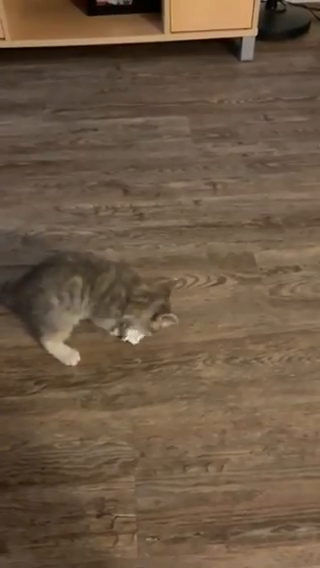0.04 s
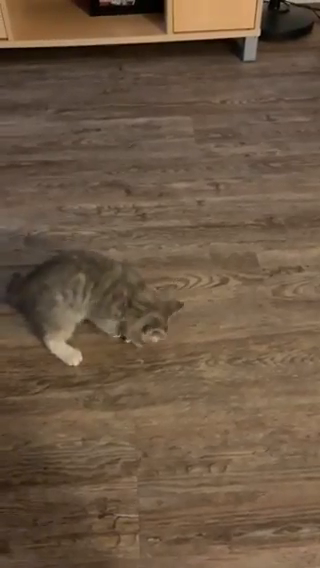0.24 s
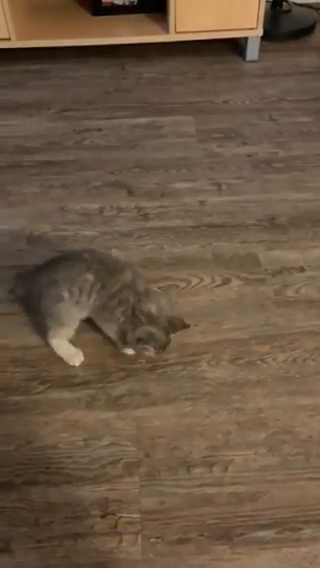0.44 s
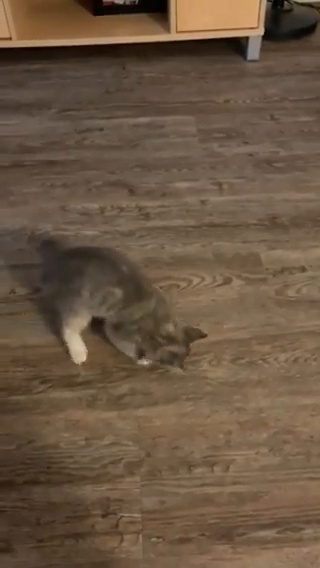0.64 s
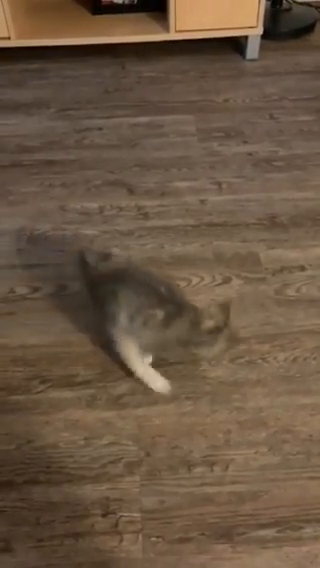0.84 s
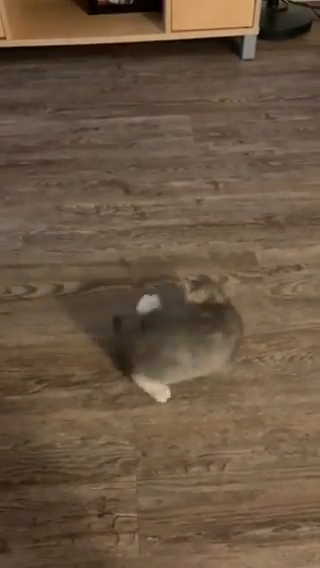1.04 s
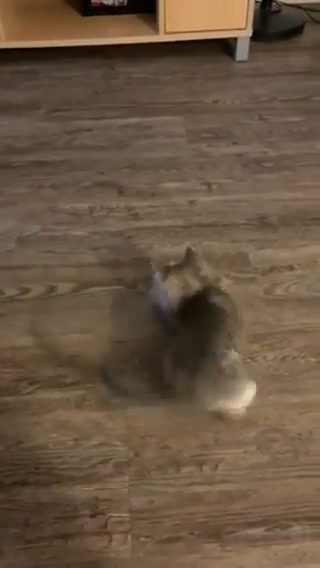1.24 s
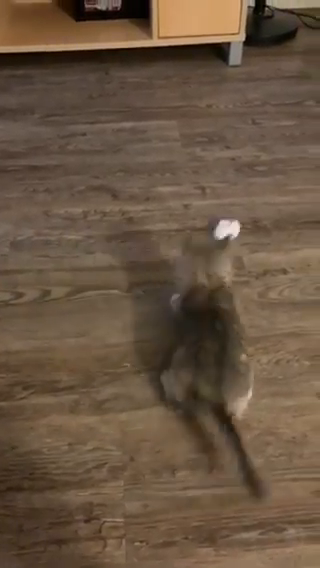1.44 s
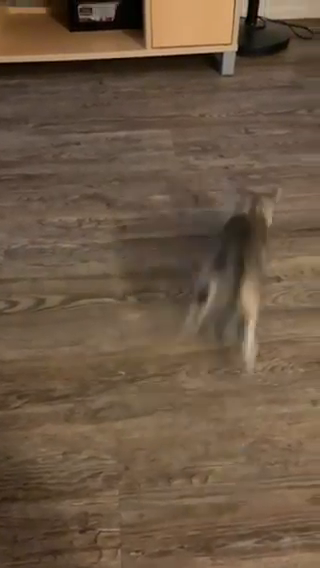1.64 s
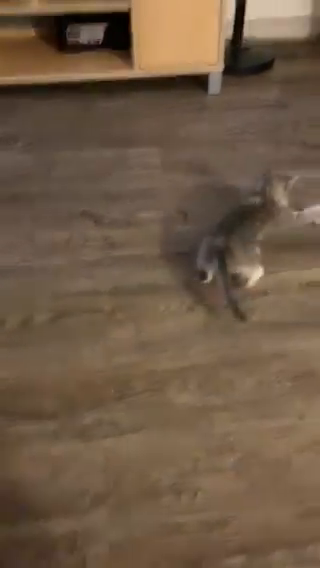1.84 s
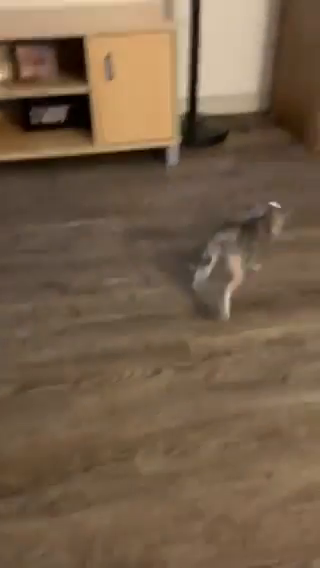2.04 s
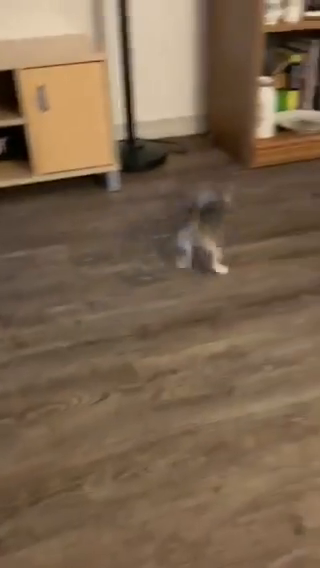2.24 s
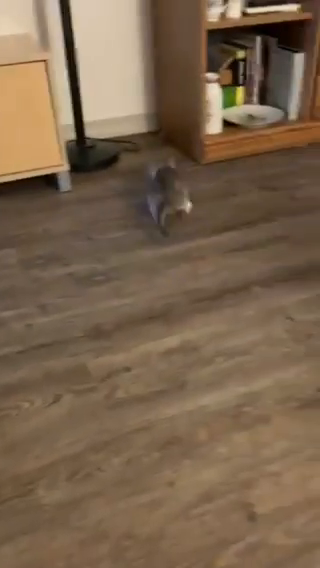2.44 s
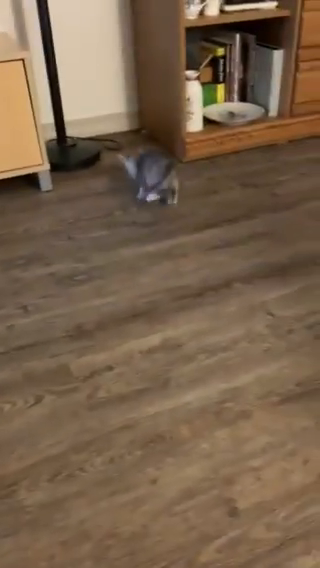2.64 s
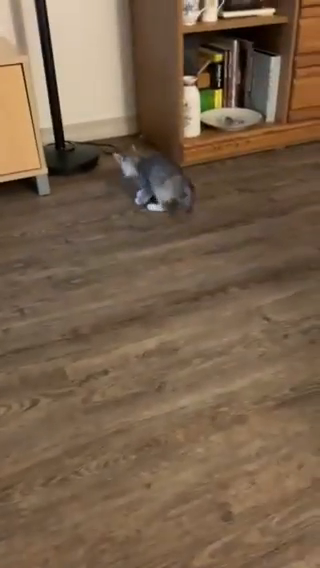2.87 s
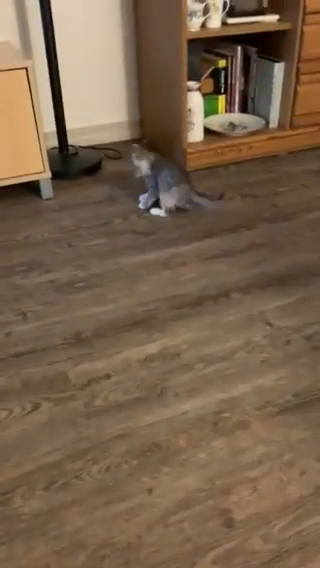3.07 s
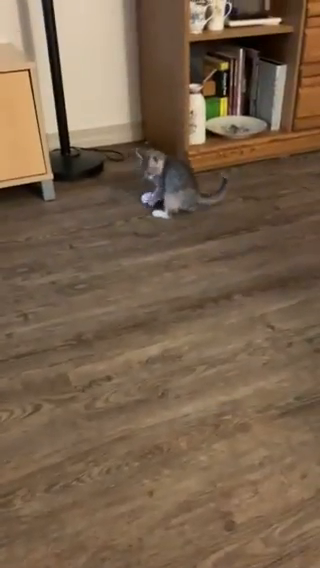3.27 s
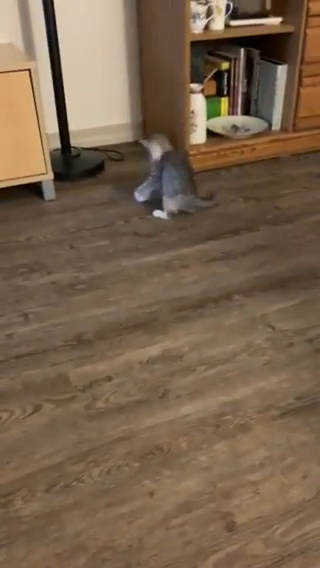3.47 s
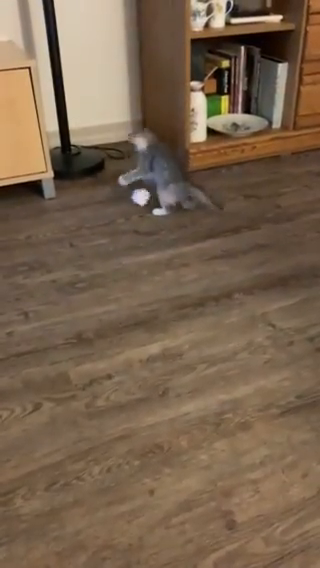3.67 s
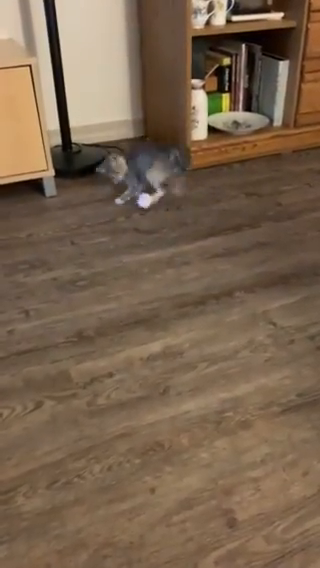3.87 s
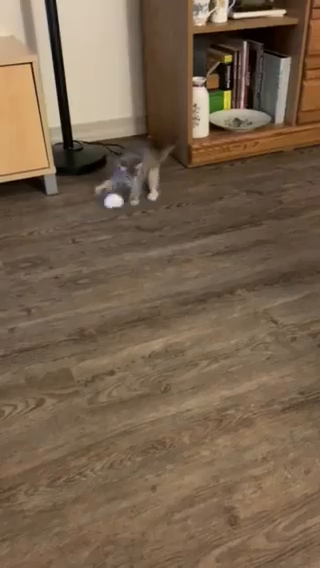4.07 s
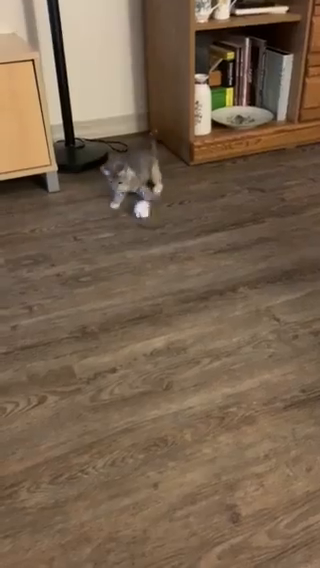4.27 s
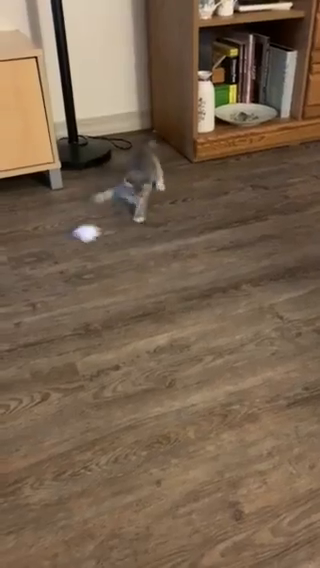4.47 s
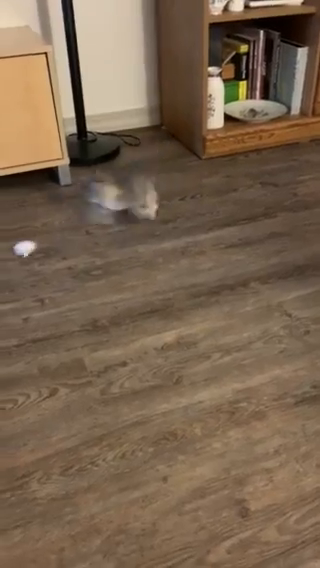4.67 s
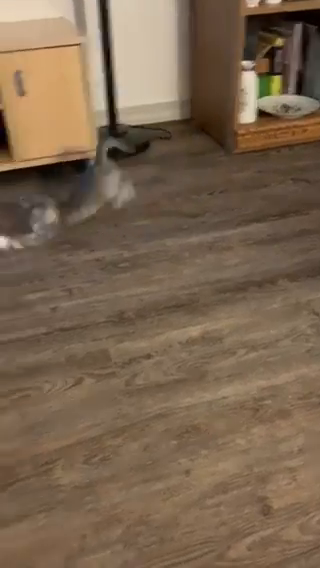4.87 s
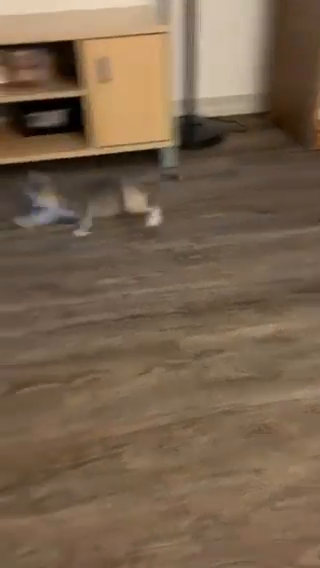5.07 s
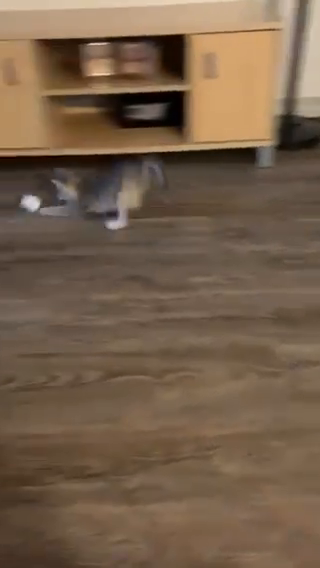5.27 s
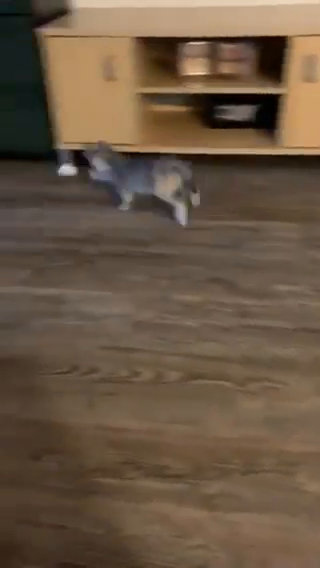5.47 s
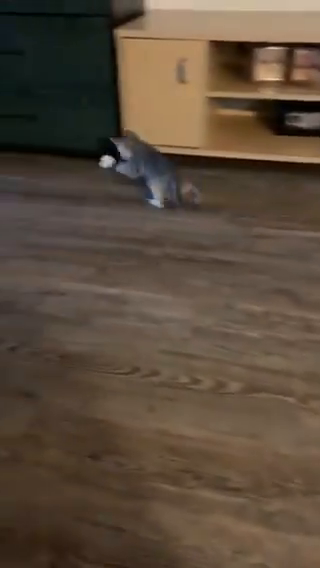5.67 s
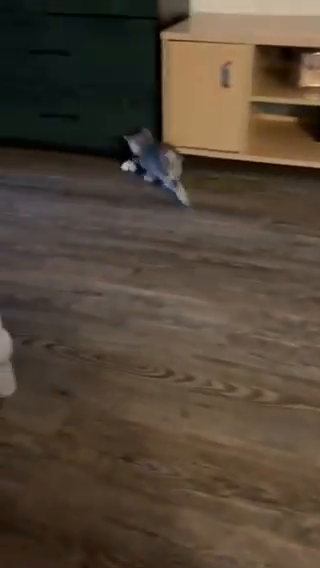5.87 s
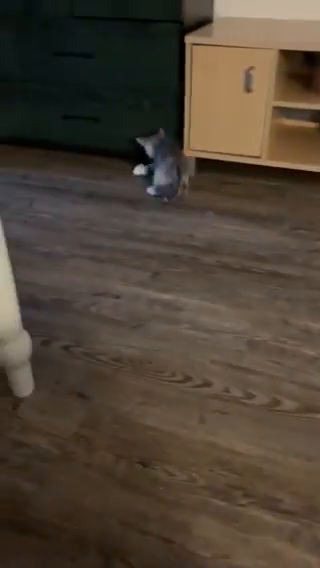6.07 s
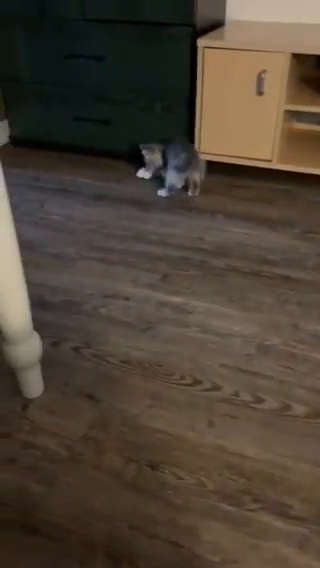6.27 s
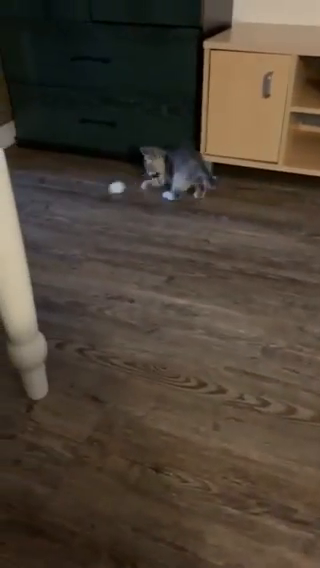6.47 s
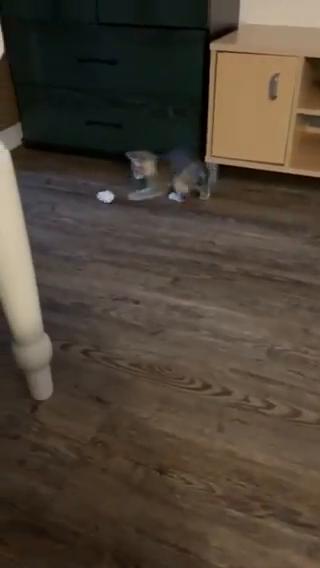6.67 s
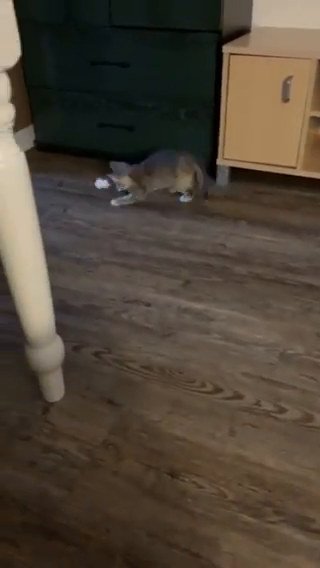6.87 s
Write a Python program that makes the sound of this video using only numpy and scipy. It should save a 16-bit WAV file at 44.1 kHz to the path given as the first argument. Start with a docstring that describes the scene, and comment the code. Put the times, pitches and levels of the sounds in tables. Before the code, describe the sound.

A kitten bats and chases a light hollow toy over a living-room plank floor. Faint scrapes grow into a flurry of sharp taps, skids and soft paw thumps. After a short lull the clicking returns, gets busier and louder, eases, then ends in another flurry. The toy whirs briefly as it rolls. A close stereo microphone picks up a short room ring, faint air rumble and an appliance hum.

```python
"""A light hollow toy, batted and chased by a kitten over a living-room plank floor.
Toy and claws tap and skid: stick-slip impulses ring the planks and the toy's shell.
The rolling toy whirs in one gliding resonance; soft paws thump the boards.
The room rings briefly, air rumbles, an appliance hums. Heard by a close microphone pair."""
import sys
import numpy as np
from scipy import signal
from scipy.fft import rfft, irfft, next_fast_len
from scipy.io import wavfile
from scipy.ndimage import map_coordinates

SR = 44100
rng = np.random.default_rng(int(sys.argv[2]) if len(sys.argv) > 2 else 0)


def persist_wave(psi):
    """Save psi, clipped to +-1, as 16-bit WAV."""
    counts = np.round(np.clip(psi, -1, 1) * 32767).astype(np.int16)
    wavfile.write(sys.argv[1], SR, np.atleast_2d(counts).T)


N = 305172

# toy and claw taps: (time [s], level [dB], chatter [s], brightness [dB], top octave [dB],
# ring [Hz], ring gain [dB])
TOY_TAPS = [(0.471, -58, 0.0093, -4.5, -3, 1090, 11), (1.001, -46.5, 0.0084, 2.5, -5, 840, -9),
            (1.058, -48.5, 0.013, 1, -4, 1770, 4), (1.1, -46.5, 0.0063, -0.5, -1, 835, 12),
            (1.218, -40.5, .008, -6.5, -5, 1560, 16), (1.236, -42, 0.0046, 14, -5, 4030, 22),
            (1.276, -30, .007, 10, -22, 1600, 10), (1.288, -55, 0.011, 24, -1, 1600, 9.5),
            (1.436, -50.5, .009, 1, -6, 1800, 21), (1.471, -42.5, .011, -1, 5.5, 1250, 12),
            (1.518, -43, 0.012, -3, 2, 1250, 6), (1.604, -38.5, .011, 3, -15, 1480, 7.5),
            (1.676, -44, .008, 15, 5, 5900, 0), (1.752, -42, 0.011, 1.5, 4, 970, 8),
            (1.815, -38.5, 0.012, 0.5, 1, 1690, 4), (1.854, -27, .006, 8.5, -3, 3600, 15),
            (1.873, -35, 0.015, 5, 2, 3500, 22.5), (1.887, -24, 0.007, 4.5, -0.5, 2450, 15),
            (1.983, -42, .009, 0, 1, 1400, 9.5), (2.077, -29, 0.0052, -7, 4, 1200, 9),
            (2.102, -33, 0.013, 2, 0, 3340, 13.5), (2.267, -25.5, 0.015, -3.5, -4, 2530, 1),
            (2.272, -33, 0.0064, 5, 5, 1500, 12), (2.404, -39, 0.0047, 9, -1.5, 3310, 10),
            (3.244, -47, .004, -2, -2.5, 1700, 2.5), (3.274, -37.5, .004, 1, -9, 2820, 12),
            (3.515, -35.5, 0.014, 3, 0, 2920, 12), (3.727, -33, .009, -0.5, -1, 940, 11),
            (3.732, -33, 0.0061, -2.5, -1.5, 2900, 4), (3.812, -38, 0.0051, 4.5, -3, 1560, 12),
            (3.958, -40, 0.0074, 0.5, -1, 3110, 14), (4.096, -35.5, 0.021, -8, -5, 1740, 5),
            (4.126, -39.5, 0.0068, 8, -9, 1400, 8), (4.145, -36.5, 0.0082, -5, 7, 1710, 10),
            (4.337, -39.5, .009, 2, -3, 2960, -5), (4.381, -31, 0.0063, -2.5, 8.5, 2950, 15),
            (4.391, -31, 0.013, -10.5, 0, 2950, 5), (4.403, -48, 0.0025, -1, 2, 2400, 3),
            (4.419, -36, 0.0072, 8, 4, 2140, 17.5), (4.46, -39.5, .009, 9.5, 1, 2900, -10),
            (4.506, -38.5, 0.011, -1, 1, 1290, 11), (4.537, -33.5, 0.0088, -2, 7, 940, 9),
            (4.542, -37, 0.0055, 10, 0, 2000, 0), (4.583, -45.5, .004, -1.5, -1, 2000, 2),
            (4.616, -32, 0.012, -1, 3, 3170, 12), (4.623, -32.5, 0.0055, -3, 2, 1800, 8),
            (4.707, -42.5, 0.0063, 0, 3, 1700, 5), (4.722, -23, .005, -9.5, 1, 1900, 13.5),
            (4.727, -34, 0.0059, -4.5, -5, 1350, 15), (4.84, -39.5, 0.013, 0, 4, 2000, 16),
            (4.852, -39.5, 0.012, 9, 15, 2800, 2), (4.869, -32, 0.016, 5, -1.5, 2900, 5),
            (4.884, -31.5, 0.0065, 8, 4, 2100, 9), (5.03, -30.5, 0.0041, 4.5, 0, 3700, 7.5),
            (5.144, -29.5, 0.011, 4, -3.5, 3360, 5), (5.17, -23.5, .003, -1, 2, 1100, 7),
            (5.216, -36.5, .008, 5.5, -1, 2000, 4.5), (5.238, -38, 0.012, 5, 7, 1960, 17),
            (5.254, -24, 0.0055, 14, 1, 2200, 9), (5.258, -28.5, 0.014, -5.5, 0, 2060, 14),
            (5.269, -19.5, 0.0022, 5.5, -4.5, 2750, 10.5), (5.276, -35, 0.011, 6.5, -1, 2200, 7),
            (5.315, -32.5, 0.0061, -4.5, -2, 1250, -3.5), (5.328, -25.5, 0.0044, 7, 7, 1240, 9),
            (5.333, -25, 0.0046, 6, 7.5, 2720, 13), (5.383, -30.5, .009, -4.5, -1.5, 1350, 12.5),
            (5.399, -36.5, 0.022, 6.5, 11.5, 1180, -10), (5.621, -33.5, 0.0059, 3, -8.5, 945, -3),
            (5.738, -38, 0.016, -3, 2.5, 2840, 3), (6.394, -33, .006, 2, 3, 3170, 19.5),
            (6.407, -40.5, 0.0035, 8, 1, 2750, 30), (6.442, -38.5, 0.0085, 9, -4, 2750, 17),
            (6.458, -36, 0.013, 3, 2, 1010, 20), (6.479, -48, 0.0069, 15, 11, 1040, 12),
            (6.497, -37, 0.015, 8.5, -1, 900, 14.5), (6.519, -41.5, 0.0084, 11, 6.5, 1290, 20),
            (6.582, -41.5, .006, 3, 20, 1286, 12), (6.621, -44.5, .007, 9.5, 9.5, 1800, 2),
            (6.773, -34, 0.011, 9.5, -0.5, 1210, 6), (6.799, -28.5, 0.0051, 3.5, -11, 2800, 7),
            (6.816, -30.5, .005, 1.5, -6, 1640, 5), (6.839, -41, .007, 14, 7.5, 850, 18.5),
            (6.892, -35.5, 0.0056, 6.5, 2, 1530, 11)]
# pushes that skid toy and claws: (start [s], end [s], level [dB], brightness [dB], top octave [dB],
# ring [Hz], ring gain [dB])
PUSHES = [(0.469, 0.498, -55, -3.5, -4, 1300, 6.5), (0.878, 0.908, -41, 3, -6, 1620, 1),
          (1.206, 1.222, -52, 6.5, -2, 1570, 13), (1.228, 1.271, -37, 3.5, -1.5, 6500, -5),
          (1.299, 1.453, -48.5, 4, -1.5, 3900, 8.5), (1.484, 1.6, -51.5, -3.5, -1, 1300, -15),
          (1.653, 1.681, -36, 6.5, -4, 4000, 7.5), (1.839, 1.912, -37.5, 9, 0, 2450, 11.5),
          (1.978, 1.997, -49, 4.5, 1.5, 1620, 10), (2.1, 2.128, -49.5, 11.5, -1, 3500, 10),
          (2.249, 2.329, -36, -1, -1.5, 2550, -4.5), (2.421, 2.498, -39.5, 1, 0.5, 1000, 9),
          (2.679, 2.725, -62.5, 1, 0, 1700, 1), (3.232, 3.304, -35.5, -4, 2, 1230, -1.5),
          (3.479, 3.55, -38.5, 4, 2.5, 2850, 6.5), (3.957, 4.038, -43, -1, -5, 3180, -4),
          (4.138, 4.207, -40.5, -2, 1.5, 1630, -1), (4.214, 4.289, -51, 2, -5, 1700, 1),
          (4.336, 4.357, -42, 6, 4.5, 3700, 11.5), (4.372, 4.443, -39, 7, 0.5, 3326, 4),
          (4.444, 4.479, -54, 3, 0, 1500, 4), (4.552, 4.708, -50.5, 7, 1.5, 3100, 5),
          (4.694, 4.735, -42.5, -2, 3, 1700, 4), (4.839, 4.898, -33.5, 7, 1, 3020, 9),
          (4.992, 5.013, -39, -1, 2, 1300, 8), (5.249, 5.294, -30, -1, 1.5, 2300, 4),
          (5.283, 5.355, -38.5, -10, -1, 2640, 11.5), (5.387, 5.495, -35.5, 6, -1, 1420, 0.5),
          (5.679, 5.815, -47.5, 2, -4, 950, 7), (5.809, 5.849, -44, 6.5, 0.5, 3000, -8),
          (5.863, 5.964, -45.5, -1.5, 0, 995, 5), (6.183, 6.26, -47.5, -2, -1, 3070, 1.5),
          (6.344, 6.41, -36.5, -2.5, -0.5, 2900, 1.5), (6.388, 6.524, -40.5, 0.5, 6, 2750, 4),
          (6.537, 6.652, -47, 4, -6, 1800, 11), (6.764, 6.782, -37, -0.5, -14, 1229, 11.5),
          (6.787, 6.843, -35, -14, 10, 1190, 1.5)]
# free rolls: (start [s], end [s], level [dB], first pitch [Hz], last pitch [Hz])
TOY_ROLLS = [(1.221, 1.337, -70, 1270, 1050), (1.455, 1.6, -59, 1232, 1375),
             (5.31, 5.453, -47.5, 1124, 1407), (5.594, 5.808, -67, 1390, 964),
             (6.417, 6.554, -49, 1676, 1480), (6.501, 6.761, -54, 1393, 1143)]
# hard contact on planks: (frequency [Hz], gain [dB])
PLANK_SPECTRUM = [(80, -24), (250, -8.5), (450, -11.5), (750, -10.5), (1200, -3), (2000, -4), (2800, -3),
                  (3600, -5), (4700, -4), (6000, 0.5), (7500, -10), (9400, -7.5), (11000, -14),
                  (15500, -17)]
# hollow toy resonances: (frequency [Hz], width [Hz], gain [dB])
SHELL_MODES = [(1440, 39, -0.5), (2100, 38, 0), (2920, 630, 2), (6020, 1070, -8)]
# spot-to-spot spread of resonance gains: (frequency [Hz], share [ratio])
SPOT_SPREAD = [(500, 0.36), (1500, 0.52), (2500, 0.76), (6000, 1)]
# kitten's range: (time [s], distance [m])
KITTEN_RANGE = [(0.9, 1.8), (1.9, 1.3), (2.6, 3.4), (3.3, 3.0), (4.4, 2.6), (6.9, 2.8)]
# single claw ticks: (time [s], level [dB])
CLAW_TICKS = [(2.361, -47), (3.366, -42.5), (3.577, -41.5), (3.959, -45), (4.024, -43.5), (4.126, -40),
              (4.423, -40), (4.677, -41), (4.839, -45), (5.006, -48), (5.031, -38), (5.328, -32),
              (6.583, -41.5)]
# claw tip on planks: (frequency [Hz], gain [dB])
CLAW_SPECTRUM = [(100, -35), (2500, -8), (5500, 9.5), (10500, 2), (15500, -4.5)]
# paw landings: (time [s], level [dB], board pitch [Hz], relative slap [dB])
PAW_LANDINGS = [(0.562, -57, 69, -21), (0.593, -53.5, 75, -26), (0.82, -51.5, 126, -2),
                (0.891, -45.5, 81, -1), (0.999, -47.5, 148, -7.5), (1.026, -64, 100, -13),
                (1.064, -45.5, 93, -15), (1.634, -43, 100, -13), (1.669, -48, 113, -9),
                (1.749, -41, 117, -19), (1.815, -42, 115, -15.5), (1.857, -48.5, 156, 3.5),
                (1.959, -46, 106, -30), (2.109, -45, 99, -9), (2.147, -43.5, 110, 0.5),
                (2.187, -43.5, 97.5, -26), (2.219, -46, 65, -25.5), (2.258, -42.5, 177, 4.5),
                (2.275, -37, 97.4, -3), (2.308, -44.5, 89, -4), (2.414, -48.5, 82, -13),
                (2.451, -40.5, 175, -1.5), (2.466, -41.5, 85.5, -5), (2.5, -45.5, 100, -8),
                (3.81, -52, 187, 9.5), (4.021, -52.5, 84.5, -3), (4.15, -53.5, 187, 3),
                (4.377, -52, 186, 0), (4.668, -48, 169, -10), (4.679, -47.5, 99, -18),
                (4.707, -47, 85, -20), (4.846, -45, 159, -15), (4.862, -42, 107, -15),
                (4.883, -52, 101, 9.5), (4.951, -41.5, 153, -9), (4.977, -42, 104, -27),
                (4.998, -39, 189, -20), (5.012, -39, 99, -27), (5.052, -40.5, 90, -9.5),
                (5.135, -57.5, 91, -4), (5.24, -51.5, 188, 9), (5.286, -44, 106, -3),
                (5.307, -42.5, 123, -8), (5.356, -48, 91, -18.5), (5.554, -48, 78, -3),
                (5.588, -45.5, 121, -12), (5.644, -47.5, 133, -19), (5.769, -49.5, 85.6, -7),
                (6.78, -55.5, 109.9, 4), (6.87, -52.5, 59.5, -20)]
# padded paw on boards: (frequency [Hz], gain [dB])
PAD_SPECTRUM = [(20, -50), (45, 6), (90, 6.5), (190, -2), (300, -5), (600, -18.5), (1200, -39),
                (4000, -52.5)]
# plank under a flat paw: (frequency [Hz], gain [dB])
SLAP_SPECTRUM = [(60, -27), (200, -4.5), (300, -2), (560, 3), (900, -14), (3000, -35.5)]
# still room air: (frequency [Hz], relative density [dB])
AIR_SPECTRUM = [(20, -17.5), (40, -14), (58, 1.5), (80, -6.5), (125, -4), (170, -8.5), (320, -8),
                (500, -19), (900, -23.5), (2000, -35.5), (4000, -39.5), (9000, -41), (15000, -45)]
# appliance hum: (frequency [Hz], rms level [dB])
HUM_PARTIALS = [(59.2, -74.5), (355.3, -73.5), (629.8, -88)]
# room decay: (frequency [Hz], T60 [s])
ROOM_T60 = [(100, 0.93), (300, 0.063), (800, 0.36), (2100, 0.29), (5500, 0.22), (14600, 0.16)]
# diffuse width: (frequency [Hz], side gain [dB])
SIDE_GAIN = [(60, -14.5), (150, -14), (350, -1.5), (1000, 0), (2200, 0), (3200, -2), (15000, -0.5)]
# left channel's lead: (frequency [Hz], phase [rad])
LEFT_LEAD = [(0, 0), (2100, 0), (2400, 1.45), (3700, 1.6), (4720, np.pi), (15320, 6 * np.pi)]


def taps(rows):
    """A tap swells faintly and briefly, cracks, chatters on the floor and stops short."""
    out = np.zeros((2, N))
    t = np.arange(-SR // 60, SR // 30) / SR
    after_s = np.maximum(t, 0)
    pre_swell = amp(-19.5 - 808 * np.abs(t))
    for time_s, db, chatter_s, bright_db, *colour in rows:
        chatter = 0.75 * np.tanh(after_s / 0.00028) * amp(-20 * (after_s / chatter_s) ** 3)
        crack = (t >= 0) * amp(-4 + 0.04 * bright_db) * np.exp(-after_s / 0.00065)
        force = amp(db) * (chatter + crack + pre_swell) * stick_slip(len(t), rate_hz=20000, scatter_db=2)
        knock_db = plank_knock_db(db, even_db=-32.5)
        sound = contact(force, time_s, knock_db, bright_db, *colour, ring_width_hz=300, spot_db=6)
        add(out, time_s + t[0], in_room(sound, wet_db=-2.5))
    return out


def skids():
    """A skid swells and fades as the edge catches on the grain; the skipping toy's grip wavers."""
    out = np.zeros((2, N))
    for start_s, end_s, db, *colour in skid_rows():
        count = max(round((end_s - start_s) * SR), SR // 100)
        pressure = np.abs(np.sin(np.linspace(0, np.pi, count))) ** 0.31
        grip_db = 3.8 * map_coordinates(rng.uniform(-1.5, 1.5, 128), [np.arange(count) / SR * 220])
        crackle = stick_slip(count, rate_hz=380, scatter_db=3)
        grain = stick_slip(count, rate_hz=6000, scatter_db=5) + 0.73 * crackle
        claw_ticks = np.diff(stick_slip(count + 1, rate_hz=160, scatter_db=2.5))
        force = amp(db - 3) * pressure * (unit(amp(grip_db) * grain) + 0.19 * claw_ticks)
        knock_db = plank_knock_db(db, even_db=-36)
        sound = contact(force, start_s, knock_db, *colour, ring_width_hz=740, spot_db=8)
        add(out, start_s, in_room(sound, wet_db=-3))
    return out


def skid_rows(graze_s=0.013, graze_db=-17.5, coast_ratio=0.81, coast_db=-9.5, overlap_s=0.0092):
    """The paw grazes the floor, pushes, and the toy coasts on. Rows as PUSHES."""
    grazes, coasts = [], []
    for start_s, end_s, db, *colour in PUSHES:
        coast_s = coast_ratio * (end_s - start_s)
        grazes.append((start_s - graze_s, start_s + graze_s, db + graze_db, *colour))
        coasts.append((end_s - overlap_s, end_s + coast_s, db + coast_db, *colour))
    return PUSHES + coasts + grazes


def rattle_rows(rate_hz=16, gain_db=-7, chatter_s=0.0016, extra_bright_db=14):
    """The pushed toy skips at random, hardest mid-push. Rows as TOY_TAPS."""
    rows = []
    for start_s, end_s, db, bright_db, *colour in PUSHES:
        count = int((end_s - start_s) * rate_hz)
        for k, jitter in enumerate(rng.random(16)[:count]):
            progress = (k + jitter) / count
            time_s = start_s + (end_s - start_s) * progress
            level_db = db + gain_db + 20 * np.log10(np.sin(np.pi * progress))
            rows.append((time_s, level_db, chatter_s, bright_db + extra_bright_db, *colour))
    return rows


def rolls(width_hz=110, fade_db=17.5):
    """The rolling toy whirs in one narrow resonance that glides as it turns."""
    out = np.zeros((2, N))
    for start_s, end_s, db, first_hz, last_hz in TOY_ROLLS:
        count = max(round((end_s - start_s) * SR), SR // 100)
        knots = np.arange(count) / SR * width_hz
        bumps = [map_coordinates(row, [knots], mode="mirror") for row in rng.standard_normal((2, 256))]
        phase = 2 * np.pi * np.cumsum(np.geomspace(first_hz, last_hz, count)) / SR
        whir = unit(bumps[0] * np.cos(phase) + bumps[1] * np.sin(phase))
        fade = signal.windows.tukey(count, 0.5) * amp(-fade_db * np.linspace(0, 1, count))
        add(out, start_s, in_room(amp(db) * fade * whir, wet_db=-15))
    return out


def stick_slip(count, rate_hz, scatter_db):
    """Tiny irregular catches: impulses of random size and sign, rms 1."""
    hit = rng.random(count) < rate_hz / SR
    size = amp(scatter_db * np.clip(rng.standard_normal(count), -2, 2))
    return unit(hit * size * rng.choice([-1, 1], count))


def plank_knock_db(db, even_db, slope=0.4, limit_db=27):
    """Gentler contacts are paw-padded: more of their sound is dull plank knock."""
    return min(slope * (even_db - db), limit_db)


def contact(force, time_s, knock_db, bright_db, top_db, ring_hz, ring_db, ring_width_hz, spot_db):
    """A force rings planks and toy. Each spot favours other resonances; distance dulls the top."""
    spot_hz = np.geomspace(500, 15000, 30) * rng.uniform(0.94, 1.06, 30)
    spot_gain_db = spot_db * along(SPOT_SPREAD, spot_hz) * rng.uniform(-1, 1, 30)
    spot_modes = zip(spot_hz, 170 + 0.035 * spot_hz, spot_gain_db)
    modes = [*SHELL_MODES, *spot_modes, (ring_hz, ring_width_hz, ring_db)]
    distance_m = np.interp(time_s, *np.transpose(KITTEN_RANGE))
    far_db = -4.5 * (distance_m - 2)
    tilt = [(130, 0), (400, knock_db), (800, knock_db), (1200, 0.0044), (3500, 0),
            (5500, bright_db), (8000, bright_db), (10500, bright_db + top_db),
            (12000, bright_db + top_db), (14500, bright_db + top_db / 2 + far_db)]

    def gain_db(hz):
        peaks_db = sum(db / (1 + (2 * (hz - mode_hz) / width_hz) ** 2) for mode_hz, width_hz, db in modes)
        return along(PLANK_SPECTRUM, hz) + along(tilt, hz) + peaks_db
    return coloured(force, gain_db)


def claws(decay_s=0.00086):
    """A claw tip strikes the floor: one thin treble tick."""
    out, t = np.zeros((2, N)), np.arange(SR // 100) / SR
    for time_s, db in CLAW_TICKS:
        force = amp(db) * np.exp(-t / decay_s) * rng.standard_normal(len(t))
        tick = coloured(force, lambda hz: along(CLAW_SPECTRUM, hz))
        add(out, time_s, in_room(tick, wet_db=-4.5))
    return out


def paws(board_t60_s=0.075, pad_t60_s=0.12, slap_t60_s=0.059):
    """A soft landing thuds and swings the boards; a flat, fast one also knocks the plank."""
    out, t = np.zeros((2, N)), np.arange(SR // 4) / SR
    onset = 1 - np.exp(-t / 0.0078)
    slap_onset = 1 - np.exp(-t / 0.0016)
    for time_s, db, board_hz, slap_db in PAW_LANDINGS:
        boards = np.sin(2 * np.pi * board_hz * t) * amp(-60 * t / board_t60_s)
        pad = noise(PAD_SPECTRUM, len(t)) * amp(-60 * t / pad_t60_s)
        slap = noise(SLAP_SPECTRUM, len(t)) * slap_onset * amp(slap_db - 60 * t / slap_t60_s)
        landing = onset * (2.06 * boards + 0.57 * pad) + 0.71 * slap
        add(out, time_s, in_room(amp(db) * landing, wet_db=-8))
    return out


def in_room(x, wet_db, rise_s=0.000078):
    """Mid and side of x with a fresh room tail: each floor spot echoes differently."""
    hz, t, spectra = signal.stft(rng.standard_normal((2, SR // 2)), SR, nperseg=256)
    tail = signal.istft(spectra * amp(-60 * t / along(ROOM_T60, hz)[:, None]), SR)[1]
    tail *= 1 - np.exp(-np.arange(tail.shape[1]) / SR / rise_s)
    response = amp(wet_db) * tail / np.linalg.norm(tail[0])
    response[0, 0] += 1  # direct sound, mid only
    return signal.fftconvolve(x[None], response, axes=1)


def air(level_db=-65):
    """Low, diffuse rumble of room air."""
    rumble = filtered(rng.standard_normal((2, N)), lambda hz: amp(along(AIR_SPECTRUM, hz)))
    return amp(level_db) * unit(rumble)


def appliance_hum(waver_db=3, waver_hz=12):
    """Hum partials, unsteady in level and phase; mid only."""
    out, t = np.zeros((2, N)), np.arange(N) / SR
    for hz, db in HUM_PARTIALS:
        drift, waver = [map_coordinates(row, [t * waver_hz]) for row in rng.standard_normal((2, 128))]
        out[0] += np.sqrt(2) * amp(db + waver_db * waver) * np.sin(2 * np.pi * hz * t + 0.9 * drift)
    return out


def microphone_pair(mid, side):
    """Mid and side to left and right. Left leads in the treble; that phase sets the treble width."""
    ramp_rad = lambda hz: np.interp(hz, *np.transpose(LEFT_LEAD))
    treble = lambda hz: np.clip((hz - 3500) / 1000, 0, 1)
    lead_rad = lambda hz: ramp_rad(hz) - 0.4 * treble(hz) * np.sin(2 * ramp_rad(hz))
    narrowing = lambda hz: 1 - 0.93 * treble(hz) * np.cos(ramp_rad(hz)) ** 2
    side = filtered(side, lambda hz: amp(along(SIDE_GAIN, hz)) * narrowing(hz))
    left_right = np.array([mid + side, mid - side])
    return filtered(left_right, lambda hz: np.exp(0.5j * np.outer([1, -1], lead_rad(hz))))


def amp(db):
    return 10 ** (np.asarray(db) / 20)


def unit(x):
    return x / np.sqrt(np.mean(x ** 2) + 1e-20)


def along(points, hz):
    """Interpolate (frequency [Hz], value) points on a log axis."""
    points_hz, values = np.transpose(points)
    return np.interp(np.log(hz + 1), np.log(points_hz + 1), values)


def add(track, time_s, x):
    """Mix x into track from time_s on."""
    start = max(round(time_s * SR), 0)
    track[..., start:start + x.shape[-1]] += x[..., :N - start]


def filtered(x, response):
    """Apply the complex response(hz) to x."""
    size = next_fast_len(N + SR // 2)
    return irfft(rfft(x, size) * response(np.fft.rfftfreq(size, 1 / SR)), size)[..., :N]


def coloured(x, gain_db, size=8192):
    """Apply the minimum-phase filter of gain_db(hz) to x."""
    cepstrum = irfft(np.log(amp(gain_db(np.fft.rfftfreq(size, 1 / SR)))))
    cepstrum[1:size // 2] *= 2
    cepstrum[size // 2 + 1:] = 0
    return signal.fftconvolve(x, irfft(np.exp(rfft(cepstrum)))[:size // 2])


def noise(spectrum, count):
    """Shaped noise, rms 1."""
    return unit(coloured(rng.standard_normal(count), lambda hz: along(spectrum, hz))[:count])


def scene():
    """Sum all sources as mid and side, then pick up in stereo."""
    play = taps(TOY_TAPS) + claws() + skids() + rolls() + paws()
    background = air() + appliance_hum()
    rattles = taps(rattle_rows())
    return microphone_pair(*(play + rattles + background))


def record(dry, limit_hz=15800):
    """Brick-wall low-pass."""
    return filtered(dry, lambda hz: hz < limit_hz)


dry = scene()
out = record(dry)
persist_wave(out)
```